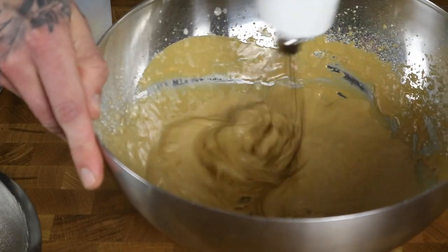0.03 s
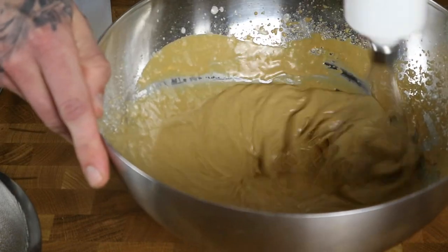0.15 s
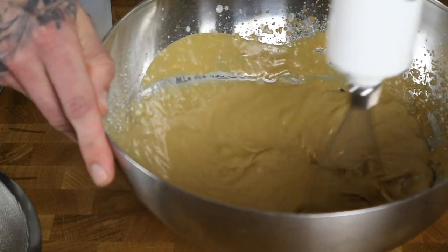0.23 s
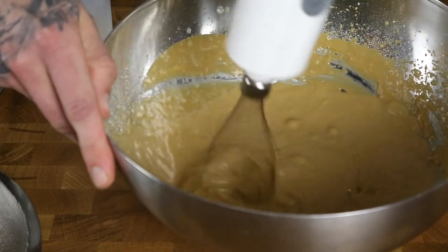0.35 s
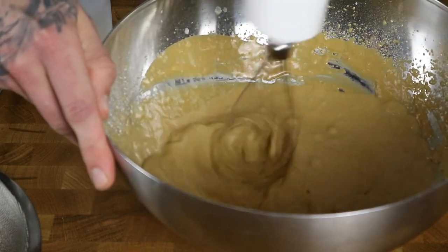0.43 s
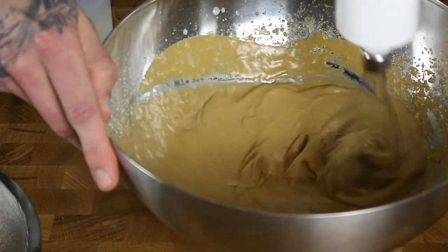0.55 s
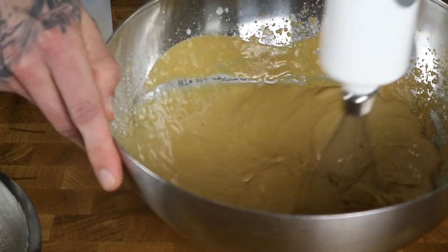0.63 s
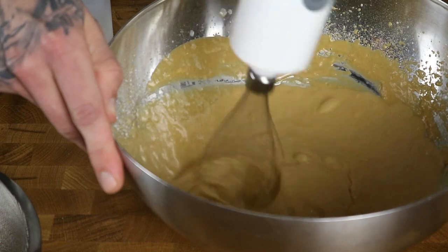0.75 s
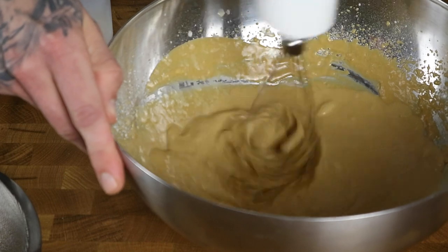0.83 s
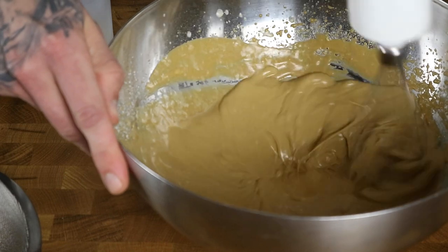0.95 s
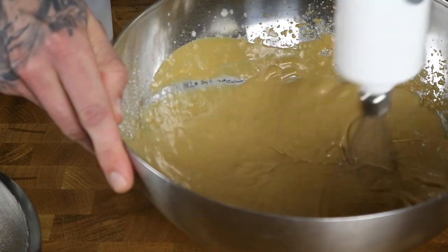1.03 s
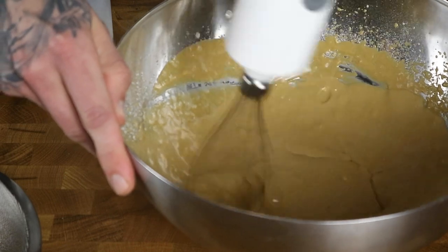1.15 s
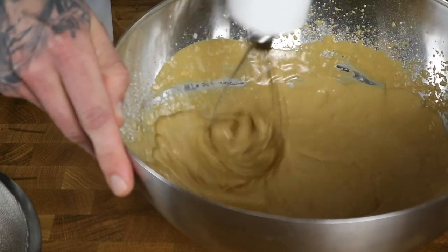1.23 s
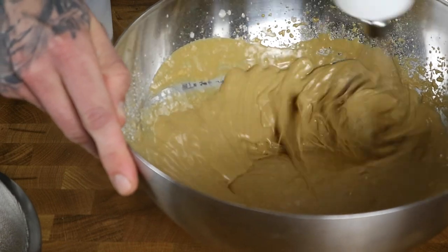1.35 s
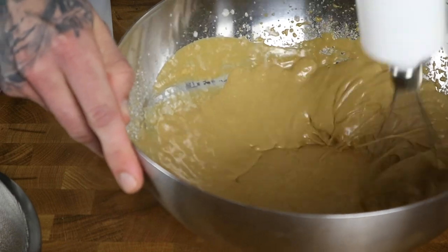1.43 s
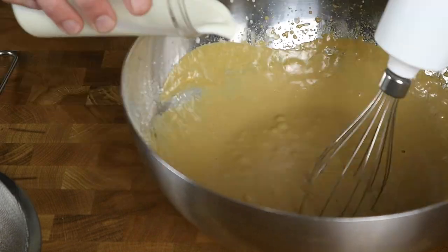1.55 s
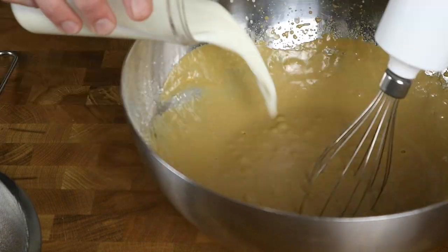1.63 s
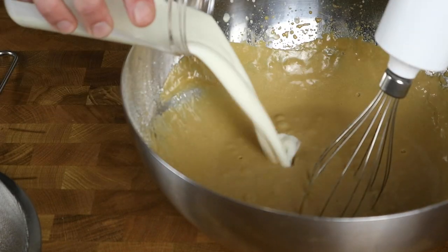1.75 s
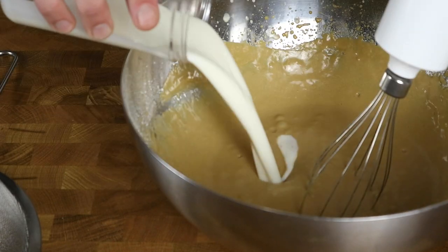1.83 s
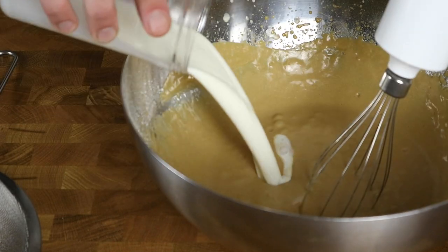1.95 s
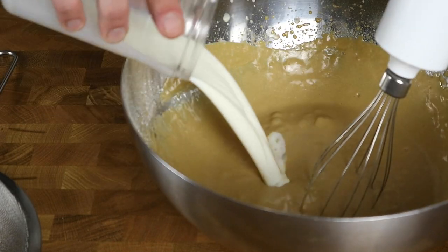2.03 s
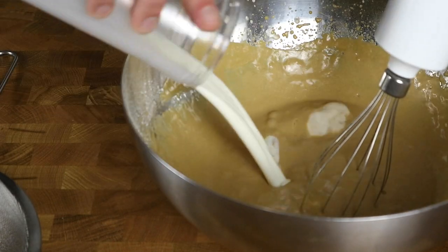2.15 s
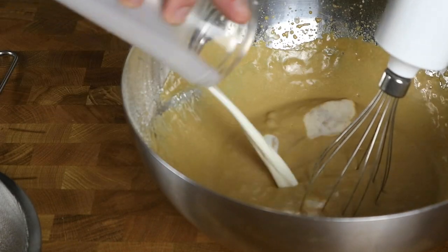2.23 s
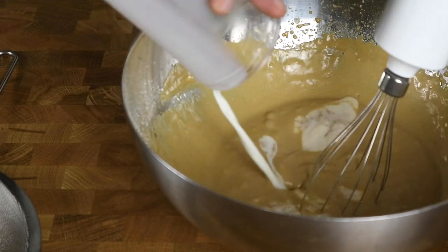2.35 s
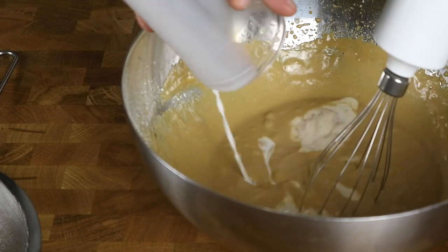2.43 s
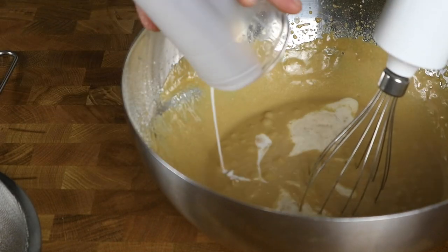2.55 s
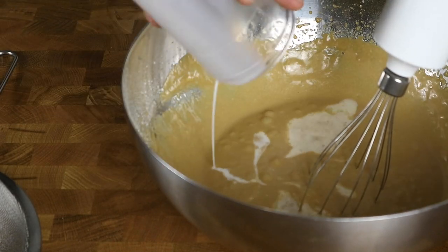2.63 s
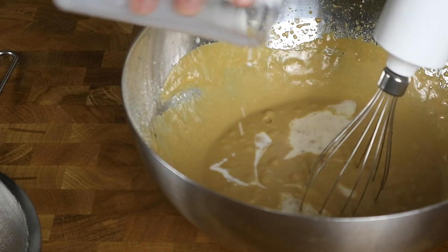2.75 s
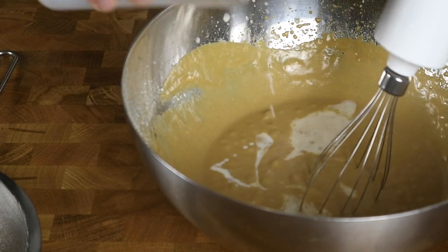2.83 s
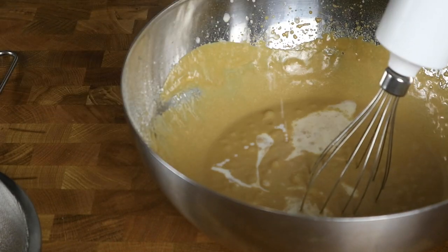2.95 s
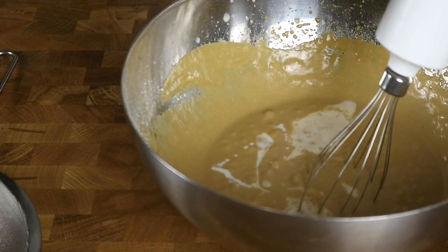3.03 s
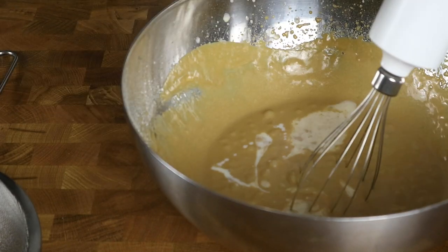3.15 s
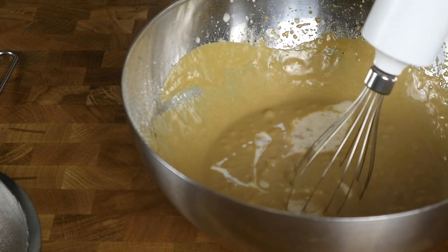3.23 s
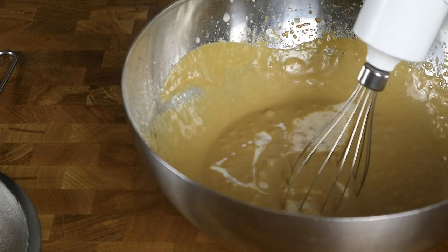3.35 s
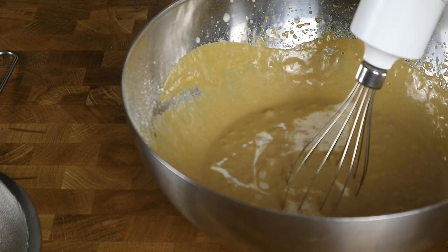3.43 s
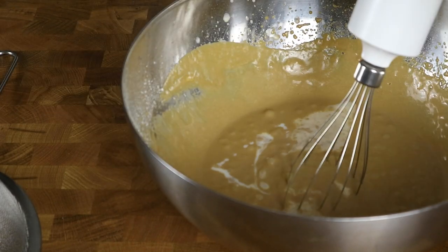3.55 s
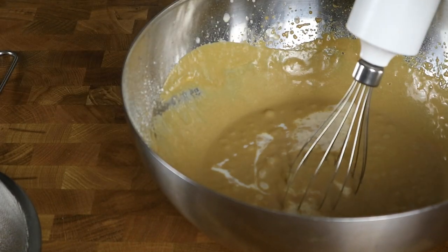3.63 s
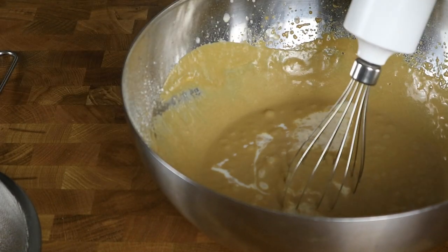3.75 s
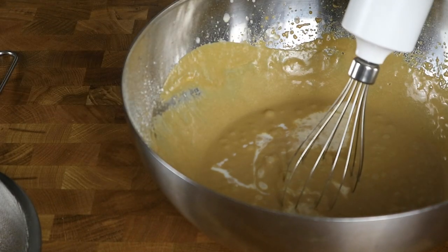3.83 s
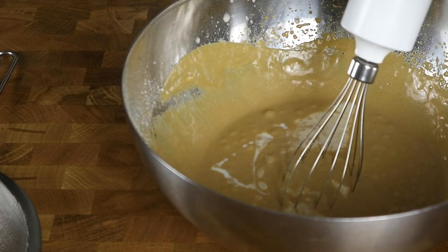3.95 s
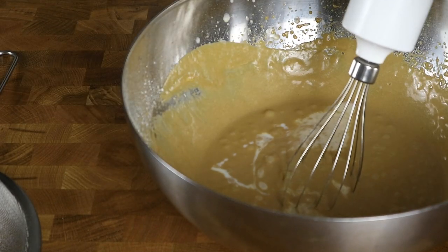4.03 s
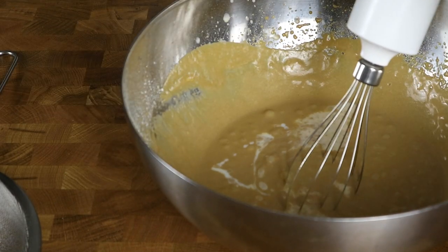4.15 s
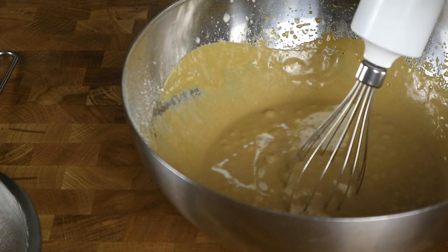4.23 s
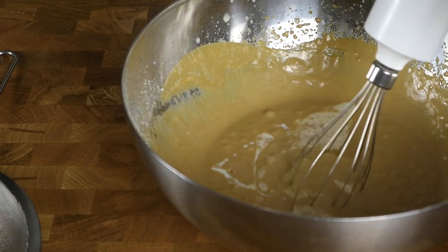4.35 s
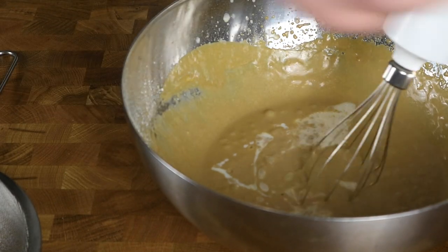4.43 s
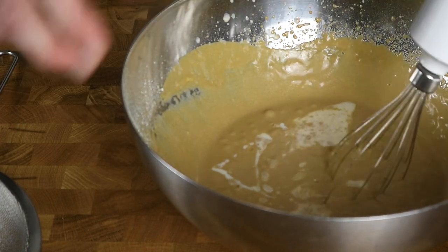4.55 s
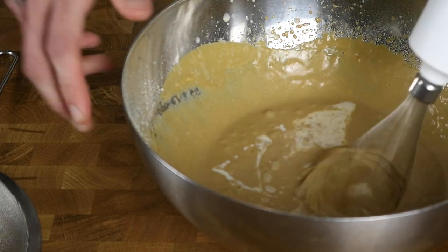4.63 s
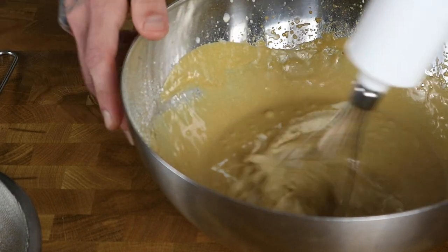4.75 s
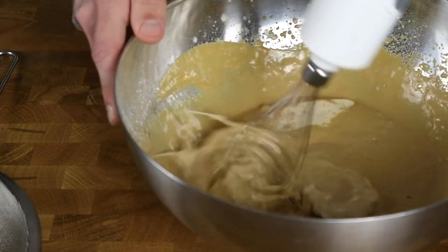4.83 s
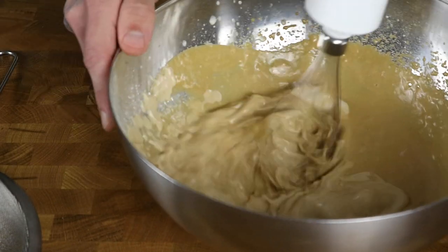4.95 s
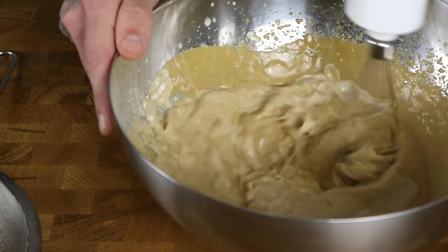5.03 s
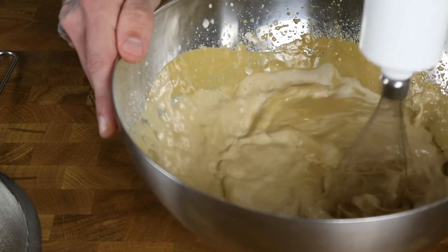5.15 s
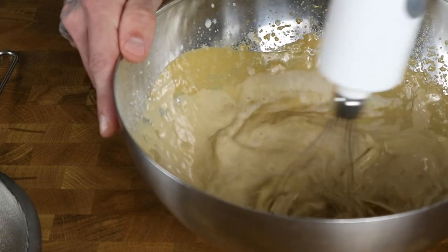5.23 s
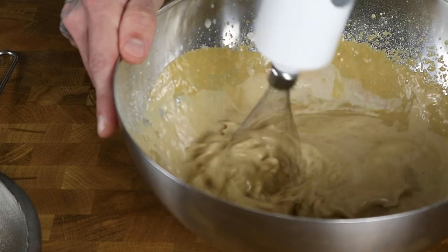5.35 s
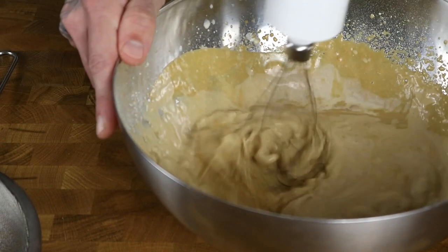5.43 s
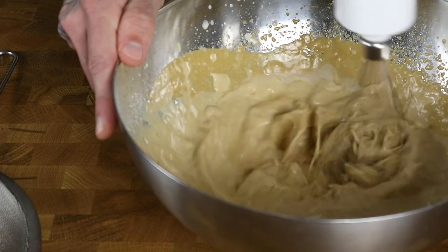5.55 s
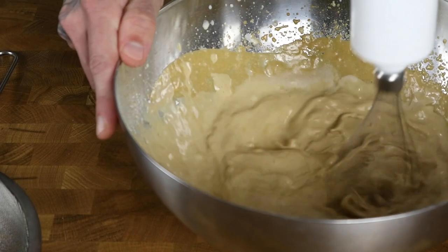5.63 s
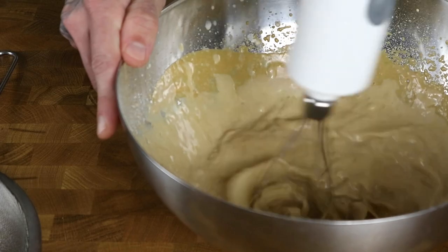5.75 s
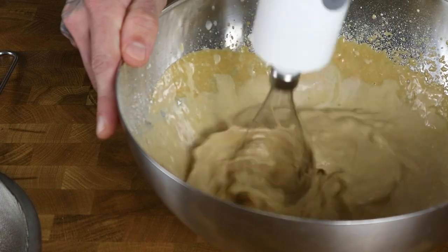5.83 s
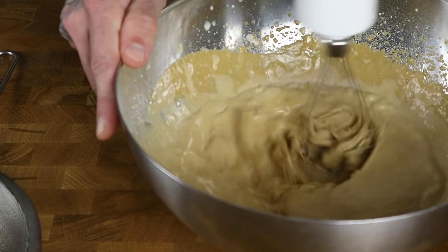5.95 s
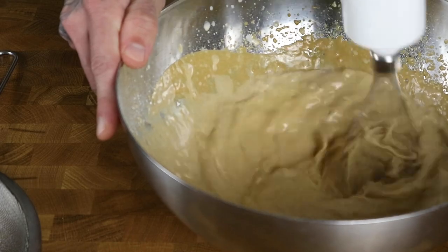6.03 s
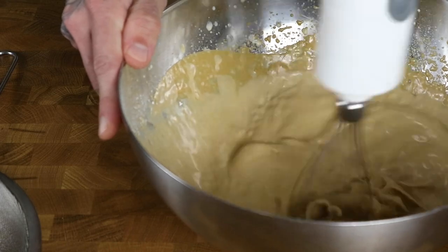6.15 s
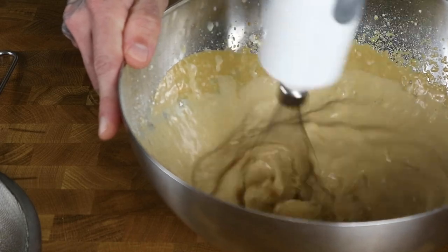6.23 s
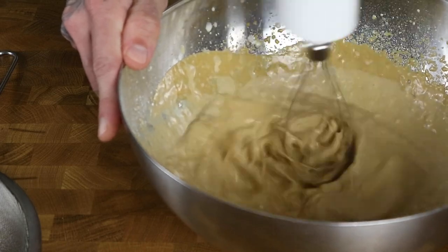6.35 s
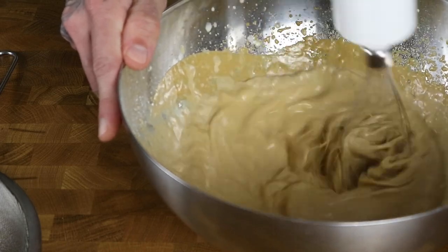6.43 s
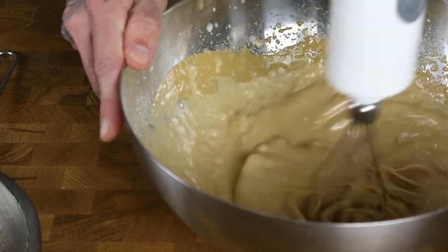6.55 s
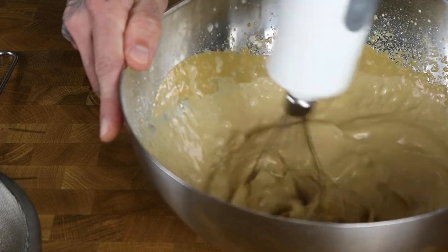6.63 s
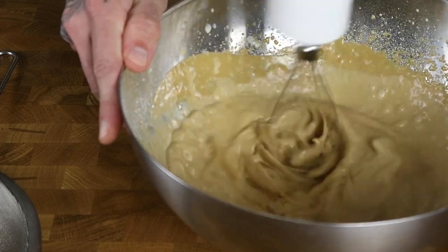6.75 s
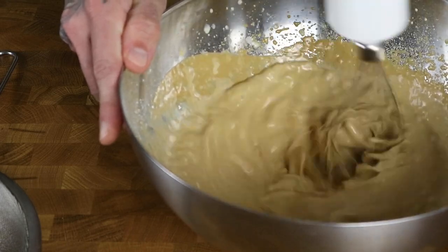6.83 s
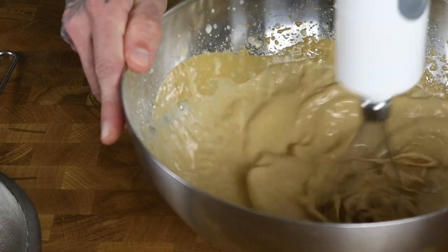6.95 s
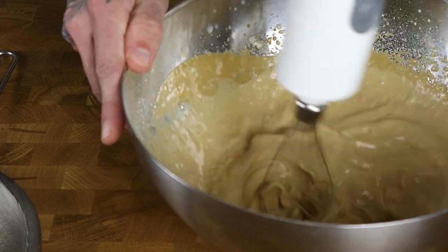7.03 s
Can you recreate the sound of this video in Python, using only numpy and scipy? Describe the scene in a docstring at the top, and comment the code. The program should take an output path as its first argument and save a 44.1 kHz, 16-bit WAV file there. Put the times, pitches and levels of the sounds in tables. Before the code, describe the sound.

A close microphone in a mildly reverberant kitchen hears an electric hand mixer already running in batter in a steel bowl. Dense rattling, a mid-range motor drone and bright airy hiss swell about every 0.4 seconds, with brief unsteady gear whines and wire slaps against the bowl. At about 1.57 s it cuts off abruptly. Low hum and faint room tone remain beneath a very quiet, dull pouring rustle; soft bumps and crisp ticks cluster from 1.65 to 1.95 s, then scatter more sparsely until 2.75 s. Around 3.1 to 3.7 s come muffled handling bumps, a small rustle and two tiny clinks. At 4.0 s an object lands hard on the wooden worktop with a sharp crack and quick bounces. The whisk restarts near 4.7 s, weaker and duller at first with fluttering slaps, reaching full noise by 5 s and circling steadily until the end near 7.1 s.

```python
"""In a kitchen, at a wooden worktop: an electric whisk circles in batter in a steel bowl, made of clicks and hiss.
It is cut off; cream is poured in as shaped noise, with soft bumps, bright ticks and two faint ringing clinks.
Something is set down hard nearby, ringing the modes of the worktop, then the whisk starts again.
Mains hum and a faint room tone lie below; the microphone's place cuts four dips into everything in the air."""
import sys
import numpy as np
from scipy import signal
from scipy.fft import rfft, irfft, next_fast_len
from scipy.io import wavfile
from scipy.ndimage import uniform_filter1d

SR = 44100
rng = np.random.default_rng(int(sys.argv[2]) if len(sys.argv) > 2 else 0)


def pcm_store(signal):
    """Save signal as 16-bit PCM."""
    levels = np.round(np.clip(np.atleast_2d(signal), -1, 1) * 32767)
    wavfile.write(sys.argv[1], SR, levels.astype(np.int16).T)


N = 312669

# spans in which the whisk sounds: start t/s, end t/s
RUN_SPANS = [(0.0, 1.572), (4.68, 7.09)]
# laps of the bowl, each starting as the wires meet the wall and load the gears: t/s, gear whine level/dB, mean f/Hz
BOWL_LAPS = [(0.075, -28, 843.6), (0.475, -32.5, 844.3), (0.845, -30.5, 843.2), (1.265, -28, 850),
             (4.95, -30, 827), (5.49, -30, 844), (5.959, -28.5, 840.7), (6.36, -31, 850.6),
             (6.79, -31.5, 847)]


def from_db(db):
    """Amplitude of a level in dB."""
    return 10 ** (np.asarray(db) / 20)


def rms_one(x):
    """Scale to rms 1."""
    return x / np.sqrt(np.mean(x ** 2) + 1e-20)


def in_time(rows, before, after):
    """Columns of a curve at every sample; before and after apply outside its span (None holds the end values)."""
    s, *columns = np.transpose(rows)
    return [np.interp(np.arange(N) / SR, s, c, before, after) for c in columns]


def at_hz(points, hz):
    """Read a curve between its points along log frequency."""
    f, values = np.transpose(points)
    return np.interp(np.log(hz), np.log(f), values)


def colour(x, spectrum):
    """Give white input a spectrum; rms 1."""
    size = next_fast_len(N)
    hz = np.fft.rfftfreq(size, 1 / SR) + 1   # 1 Hz up, to keep the logarithm finite
    return rms_one(irfft(rfft(x, size) * from_db(at_hz(spectrum, hz)), size)[:N])


def drift(rate):
    """Slow chance of spread 1: noise through two equal low-passes at rate Hz."""
    r = np.exp(-2 * np.pi * rate / SR)
    return rms_one(signal.lfilter([1], [1, -2 * r, r * r], rng.standard_normal(N + SR))[SR:])


def clicks_at(times, db):
    """Single-sample clicks in near silence."""
    out = np.full(N, 1e-18)
    out[np.round(np.asarray(times) * SR).astype(int)] = from_db(db)
    return out


def ring(clicks, hz, t60):
    """A unit click sets a sine of height 1 ringing."""
    r, w = from_db(-60 / (t60 * SR)), 2 * np.pi * hz / SR
    return signal.lfilter([0, np.sin(w)], [1, -2 * r * np.cos(w), r * r], clicks)


def fade(clicks, t60):
    """Envelope that jumps at each click and dies away."""
    return signal.lfilter([1], [1, -from_db(-60 / (t60 * SR))], clicks)


def resonance(x, hz, width_hz):
    """Band-pass resonance with gain 1 on top."""
    r = np.exp(-np.pi * width_hz / SR)
    return signal.lfilter(np.array([1, 0, -1]) * (1 - r * r) / 2, [1, -2 * r * np.cos(2 * np.pi * hz / SR), r * r], x)


def running():
    """On during the runs, rising over 10 ms and falling over 3 ms."""
    t = np.arange(N) / SR
    return sum(np.clip((t - start) / .01, 0, 1) * np.clip((end + .002 - t) / .003, 0, 1)
               for start, end in RUN_SPANS)


def lap_swell(mean_db, swing_db, peak_share):
    """Gain that rises and falls once per lap, highest at peak_share of the lap."""
    lap_s = 0.38   # usual length of a lap
    starts = np.transpose(BOWL_LAPS)[0]
    # extra marks stand for the laps that the runs leave unfinished
    first_end, second_start = RUN_SPANS[0][1], RUN_SPANS[1][0]
    marks = np.sort([starts[0] - lap_s, *starts, first_end + lap_s / 4,
                     second_start - lap_s / 2, starts[-1] + lap_s])
    laps = np.interp(np.arange(N) / SR, marks, np.arange(len(marks)))
    return from_db(mean_db + swing_db * np.cos(2 * np.pi * (laps - peak_share)))


def wire_contacts(per_s, hiss_db):
    """Gear teeth and wires touch: dense clicks of either sign at rms 1, on a bed of hiss."""
    signs = rng.choice([-1, 1], N)
    clicks = rms_one(signs * (rng.random(N) < per_s / SR))
    return clicks + from_db(hiss_db) * rng.standard_normal(N)


def rattle_and_bowl(contacts):
    """The contacts rattle in a broad band and shake the resonances of the steel bowl."""
    # rattle spectrum, shape only: f/Hz, level/dB per Hz
    rattle_shape = [(300, -39.5), (450, -11), (900, 6), (1400, -2), (3600, -1.5), (5000, -2.5), (6000, -13),
                    (8000, -41.5)]
    # steel modes shaken by the whisk, before the lap swell: f/Hz, width/Hz, level/dB
    bowl_modes = [(244, 12, -48), (338.7, 10, -54), (446, 27, -26.5), (518, 35, -32), (943, 160, -18),
                  (2210, 48, -22), (2444, 19, -29.5)]
    rattle = colour(contacts, rattle_shape)
    bowl = sum(from_db(db) * rms_one(resonance(contacts, hz, width_hz)) for hz, width_hz, db in bowl_modes)
    return (lap_swell(mean_db=-6.5, swing_db=0.77, peak_share=.35) * rattle
            + lap_swell(mean_db=0.1, swing_db=0.84, peak_share=.25) * bowl)


def housing_drone():
    """The housing drones: noise in a middle band, swelling with each lap."""
    # drone spectrum, shape only: f/Hz, level/dB per Hz
    drone_shape = [(1100, -39), (1450, 4), (1700, 6.5), (2300, 2), (2700, 0.5), (3300, -16)]
    return lap_swell(mean_db=-8, swing_db=2.6, peak_share=0.39) * colour(rng.standard_normal(N), drone_shape)


def sliding(x, shape, peak_hz):
    """A spectrum that slides with its peak: blend of copies at fixed pitches."""
    pitches = np.linspace(6600, 7800, 3)
    place = np.interp(peak_hz, pitches, np.arange(len(pitches)))
    return sum(np.clip(1 - abs(place - k), 0, 1) * colour(x, np.multiply(shape, [hz, 1]))
               for k, hz in enumerate(pitches))


def vent_hiss(contacts, peak_hz):
    """The motor's vents hiss round a sliding peak, with a top hiss above that swells with each lap."""
    # vent spectrum, shape only: f as a share of the peak's, level/dB per Hz
    vent_shape = [(.6, -36.5), (.8, -1), (1.0, 5.5), (1.2, -2), (1.5, -39)]
    # top hiss spectrum, shape only: f as a share of the peak's, level/dB per Hz
    top_shape = [(1.1, -34), (1.3, -4.5), (1.62, 4.5), (1.901, -8.5), (2.3, -23.5)]
    spin_up_s, spin_up_dull_db = 0.14, -4.5
    # at the second start the top hiss is lower and comes up as the motor gains speed
    slow = np.exp(-abs(np.arange(N) / SR - RUN_SPANS[1][0]) / spin_up_s)
    top = lap_swell(mean_db=-5.5, swing_db=1.5, peak_share=.55) * from_db(spin_up_dull_db * slow)
    return sliding(contacts, vent_shape, peak_hz) + top * sliding(contacts, top_shape, peak_hz)


def patches(x, patchy_db, rate):
    """Each half octave swells on its own as the whisk turns and tilts."""
    size = next_fast_len(N)
    place = 2 * np.log2(np.fft.rfftfreq(size, 1 / SR) / 250 + 1)   # band number of each frequency
    spectrum = rfft(x, size)
    out = 0
    for k in range(14):
        band = irfft(spectrum * np.clip(1 - abs(place - k), 0, 1), size)[:N]
        out = out + band * from_db(patchy_db * drift(rate))
    return out


def whine(vents_db):
    """The gear mesh sings unsteadily: faint when idle, swelling at the start of each lap, then dying away."""
    rise_s, hold_s, fall_db_per_s = 0.026, .08, 92
    idle_db = -22   # relative to the whisk's level
    t = np.arange(N) / SR
    s, db, hz = np.transpose(BOWL_LAPS)
    level = from_db(vents_db + idle_db)
    for start, peak_db in zip(s, db):
        after = np.maximum(t - start - rise_s - hold_s, 0)
        level = level + np.clip((t - start) / rise_s, 0, 1) * from_db(peak_db - fall_db_per_s * after)
    wavering_hz = np.interp(t, s + rise_s, hz) * (1 + .0075 * drift(30.0))
    turns = np.cumsum(wavering_hz) / SR
    return np.sqrt(2) * np.sin(2 * np.pi * turns) * level * from_db(4.0 * drift(45.0))


def worktop_rumble():
    """Shaking that reaches the microphone through the worktop: low noise of unsteady level."""
    # rumble spectrum, shape only: f/Hz, level/dB per Hz
    rumble_shape = [(15, 1), (60, 14), (110, -14.5), (300, -18), (400, -32)]
    return colour(rng.standard_normal(N), rumble_shape) * from_db(2.5 * drift(6.0))


def wire_slaps(x):
    """A slap swells for a moment as the wires sweep along the steel."""
    # wires on the bowl: t/s, level/dB of the burst's gain
    slap_times = [(0.214, -16), (0.286, -28), (0.9074, -23), (1.0197, -28), (1.2732, -18.5),
                  (4.7325, -24.5), (4.786, -23), (4.845, -29), (4.8753, -21), (4.89, -28), (4.9357, -19),
                  (4.947, -27), (5.064, -24)]
    return uniform_filter1d(fade(clicks_at(*np.transpose(slap_times)), 0.038), size=60) * x


def whisk():
    """Gear teeth and wires rattle in clumps, the housing drones, the vents hiss; returns air and worktop sound."""
    # one list per run: t/s, whisk level/dB, hiss peak f/Hz as the whisk tilts
    run_curves = [
        [(0.0, -21, 7350), (0.056, -22.5, 6870), (0.074, -23.5, 7060), (0.1, -20, 7360), (0.536, -22, 7240),
         (0.558, -18.5, 7470), (0.864, -25.5, 7360), (0.892, -21.5, 7430), (1.22, -22, 7500), (1.57, -19, 7600)],
        [(4.69, -29.5, 7100), (4.72, -30, 7220), (5.04, -22, 7450), (5.42, -24.5, 6810), (5.58, -23, 7050),
         (6.46, -24.5, 6930), (6.57, -22.5, 7160), (6.92, -22.5, 7010), (7.08, -21.5, 7400), (7.09, -23, 7350)],
    ]
    dip_s, dip_length_s, dip_db = 4.832, 0.013, -9.5   # the level dips briefly as the whisk starts up
    vents_db, peak_hz = in_time(run_curves[0] + run_curves[1], None, None)
    vents_db = vents_db + dip_db * np.exp(-((np.arange(N) / SR - dip_s) / dip_length_s) ** 4)
    clumps = from_db(0.3 * drift(33.0) + 2.0 * drift(100.0))
    contacts = wire_contacts(per_s=5000.0, hiss_db=5.0)
    rattle = rattle_and_bowl(contacts)
    treble = vent_hiss(contacts, peak_hz)
    mixed = from_db(vents_db) * (rattle + housing_drone() + treble)
    steady = patches(mixed, patchy_db=1.5, rate=5.7) * clumps
    airborne = running() * (steady + whine(vents_db)) + wire_slaps(rattle + treble)
    return airborne, running() * from_db(vents_db - 42.0) * worktop_rumble()


def kitchen(x):
    """Reverberation: noise in half-octave bands, each dying at its own rate, building up over 12 ms."""
    # decay of the room: f/Hz, t60/s
    room_decay = [(200, 0.41), (530, 0.66), (1200, 0.81), (2000, 0.65), (3400, 0.36), (6000, 0.42),
                  (9700, 0.32)]
    t, tail = np.arange(SR) / SR, 0
    for low in 100 * 2 ** np.arange(0, 7.5, .5):
        half_octave = signal.butter(2, [low, np.sqrt(2) * low], "band", fs=SR, output="sos")
        band = signal.sosfilt(half_octave, rng.standard_normal(SR))
        tail = tail + band * from_db(-60 * t / at_hz(room_decay, low * 2 ** (1 / 4)))
    tail = tail * np.clip(t / .012, 0, 1)
    return signal.fftconvolve(x, tail / np.sqrt(np.sum(tail ** 2)))[:N]


def dips(x):
    """Reflections near the microphone cancel narrow bands."""
    # cancelled bands: f/Hz, width/Hz, depth/dB
    notches = [(366, 72, 13), (1222, 130, 17), (2983, 350, 15), (5137, 660, 9.5)]
    for hz, width_hz, depth_db in notches:
        w = 2 * np.pi * hz / SR
        wide = np.pi * width_hz / SR * from_db(depth_db / 2)
        narrow = wide * from_db(-depth_db)
        x = signal.lfilter([1 + narrow, -2 * np.cos(w), 1 - narrow], [1 + wide, -2 * np.cos(w), 1 - wide], x)
    return x


def hum():
    """Mains tones that waver a little in level."""
    # mains tones: f/Hz, mean level/dB rms
    mains_tones = [(50, -58), (150, -68.5), (250, -82.5), (350, -88.5), (450, -83.5)]
    t, out = np.arange(N) / SR, 0
    for hz, db in mains_tones:
        tone = np.sin(2 * np.pi * hz * t + rng.uniform(0, 2 * np.pi))
        out = out + np.sqrt(2) * from_db(db + .7 * drift(3.0)) * tone
    return out


def room_tone():
    """The faint room tone is steady noise with a fixed spectrum."""
    # room tone spectrum, shape only: f/Hz, level/dB per Hz
    tone_shape = [(20, -18), (60, -9), (120, -5.5), (300, -19.5), (600, -17), (1500, -22.5), (4000, -31.5),
                  (8000, -28), (16000, -27)]
    return from_db(-66.5) * colour(rng.standard_normal(N), tone_shape)


def pouring_rustle():
    """Pouring and shuffling: dull noise whose level follows a curve and flutters slightly."""
    # pouring and shuffling: t/s, mean level/dB
    rustle_curve = [(1.57, -73.5), (2.03, -72), (2.15, -76.5), (2.93, -85.5), (3.14, -71), (3.3, -64.5),
                    (3.42, -74), (4.0, -78.5)]
    # rustle spectrum, shape only: f/Hz, level/dB per Hz
    rustle_shape = [(210, -37.5), (350, -17.5), (577, -11), (1220, -17), (1500, -24.5), (3660, -40),
                    (5000, -32.5), (6500, -62.5), (11000, -120)]
    level_db = in_time(rustle_curve, -99, -99)[0] + 0.83 * drift(20.0)
    return from_db(level_db) * colour(rng.standard_normal(N), rustle_shape)


def bumps():
    """Jar and bowl are bumped: brief noise in a dull and a sharper band."""
    # bumps, before smoothing and filtering: t/s, dull level/dB, sharper level/dB
    bump_times = [(1.662, -43, -55), (1.674, -36.5, -78), (1.765, -60, -54), (1.829, -52, -48),
                  (1.834, -49.5, -47.5), (1.84, -45, -51), (1.869, -46, -63), (1.914, -46, -63),
                  (1.948, -50, -62), (2.184, -54, -61), (2.457, -53.5, -61), (2.494, -47, -55),
                  (2.512, -61, -59), (2.558, -59, -72), (2.75, -65, -66), (3.109, -53, -77),
                  (3.18, -55, -73), (3.452, -56, -77), (3.513, -47.5, -73), (3.53, -52, -73),
                  (3.563, -49.5, -77), (3.576, -51, -77), (3.664, -48.5, -66.5)]
    s, dull_db, sharp_db = np.transpose(bump_times)
    noise = rng.standard_normal(N)
    dull_swell = uniform_filter1d(fade(clicks_at(s, dull_db), 0.044), size=120)
    dull = resonance(dull_swell * rms_one(resonance(noise, 430, 790)), 430, 500)
    sharp_swell = uniform_filter1d(fade(clicks_at(s, sharp_db), .03), size=60)
    sharp = resonance(sharp_swell * rms_one(resonance(noise, 2000, 1600)), 2000, 1400)
    return dull + sharp


def ticks():
    """Bright ticks are short bursts of noise, each round a centre of its own."""
    # ticks, before the last filter: t/s, level/dB, centre f/Hz
    tick_times = [(1.766, -56, 7430), (1.811, -56, 6500), (1.82, -58, 8500), (1.829, -44, 10000),
                  (1.833, -45, 6500), (1.843, -53, 7000), (1.868, -50, 9000), (1.889, -49, 8130),
                  (1.914, -62, 12000), (1.936, -48.5, 8500), (1.948, -50, 10800), (2.348, -64.5, 7510),
                  (2.457, -65.5, 7500), (2.494, -59, 7790), (2.523, -50, 12200), (2.558, -60.5, 7950),
                  (2.598, -55, 10950), (2.671, -63.5, 8270), (2.746, -56, 7490), (2.762, -60, 8100),
                  (3.652, -66, 9000), (4.029, -35.5, 6950), (4.038, -48, 6970)]
    out, t = np.zeros(N), np.arange(SR // 20) / SR
    for (s, db, hz), noise in zip(tick_times, rng.standard_normal((len(tick_times), len(t)))):
        burst = from_db(db - 60 * t / 0.013) * rms_one(resonance(noise, hz, .6 * hz))   # t60 13 ms
        out[int(s * SR):][:len(t)] += resonance(burst, hz, .7 * hz)
    return out


def clinks():
    """Two faint clinks, each a click that rings one decaying sine."""
    # clinks: t/s, level/dB
    clink_times = [(3.179, -62), (3.451, -62)]
    return ring(clicks_at(*np.transpose(clink_times)), hz=3650, t60=.025)


def worktop(times, db, spread_db):
    """Each blow strikes every mode with a strength of its own; neighbouring modes start in opposite directions."""
    # modes of the wood: f/Hz, mean level/dB relative to the blow, t60/s
    wood_modes = [(119.5, -14.5, 0.028), (342, -17.5, .03), (472, -4, 0.026), (559, -1.5, 0.038),
                  (754, 5.5, 0.013), (793, -4.5, 0.01), (932, -4, 0.016), (1720, -7.5, 0.009),
                  (1810, -4.5, 0.016), (2390, -19, .008), (3270, -14, 0.012), (3590, -14, 0.0094),
                  (4640, -31, 0.0043), (6450, -23, 0.0029), (7800, -32, 0.0065)]
    luck = rng.normal(0, 1, (len(times), len(wood_modes)))
    return sum((-1) ** k * ring(clicks_at(times, db + level_db + spread_db * luck[:, k]), hz, t60)
               for k, (hz, level_db, t60) in enumerate(wood_modes))


def set_down():
    """An object set down hard rings the worktop under a dry crack of noise; returns the thud and the crack."""
    # object set down, with bounces: t/s, blow level/dB
    blows = [(4.003, -7.5), (4.015, -14.5), (4.02, -12.5), (4.031, -23.5)]
    s, db = np.transpose(blows)
    crack_db = -28   # relative to the blow
    crack = fade(clicks_at(s, db + crack_db), 0.021) * rng.standard_normal(N)
    contact = signal.butter(2, [250, 9000], "band", fs=SR, output="sos")   # a firm, light blow: little bass
    return signal.sosfilt(contact, worktop(s, db, spread_db=3.5) + crack), crack


def scene():
    """Mix the air with its reverberation, cut the microphone's dips, then add worktop shaking and hum."""
    whisked, shaking = whisk()
    # the whisk's reverberation is cut off together with it
    whisked = whisked + running() * from_db(-9.0) * kitchen(whisked)
    bumped, ticked = bumps(), ticks()
    thud, crack = set_down()
    to_room = from_db(-5.5) * thud + from_db(-13.0) * crack + from_db(-8.0) * bumped + from_db(-10.0) * ticked
    air = whisked + thud + bumped + ticked + clinks() + kitchen(to_room) + pouring_rustle() + room_tone()
    return (dips(air) + shaking + hum())[None]


def record(dry):
    """The lopsided input stage turns a share of the treble's size into a slow shift; the top is cut."""
    rectified_share, cutoff_hz = .07, 15720
    treble = signal.sosfilt(signal.butter(2, 3500, "high", fs=SR, output="sos"), dry)
    shift = signal.sosfilt(signal.butter(1, 60, fs=SR, output="sos"), abs(treble))
    top_cut = signal.ellip(12, .5, 52, cutoff_hz, fs=SR, output="sos")
    return signal.sosfilt(top_cut, dry + rectified_share * shift)


dry = scene()
out = record(dry)
pcm_store(out)
```